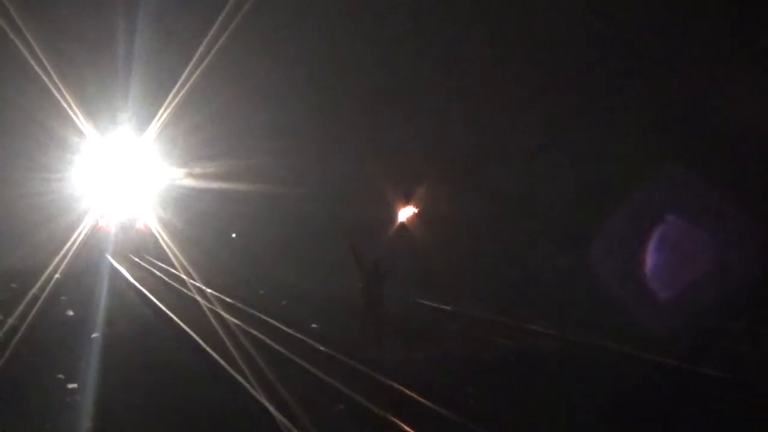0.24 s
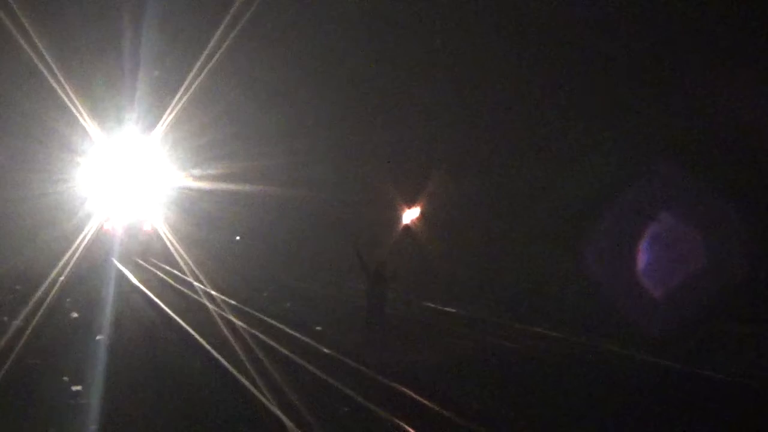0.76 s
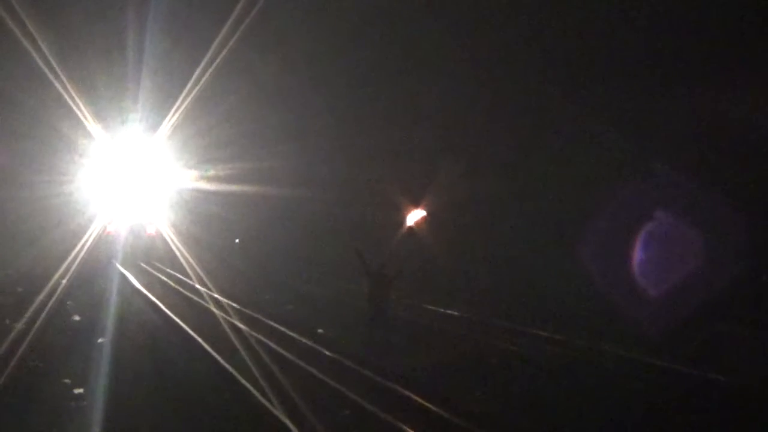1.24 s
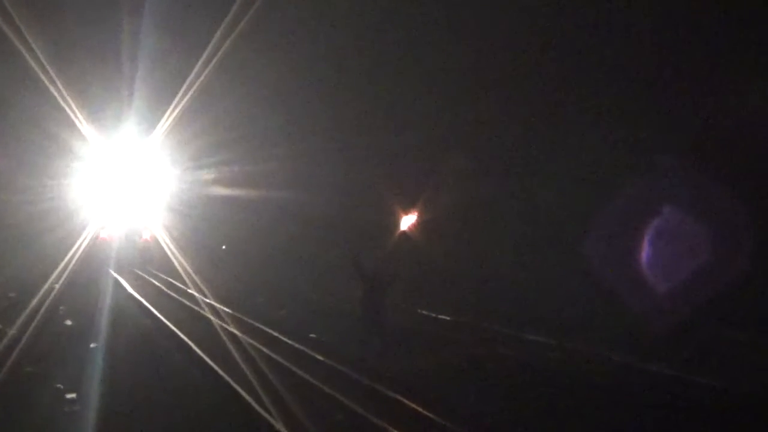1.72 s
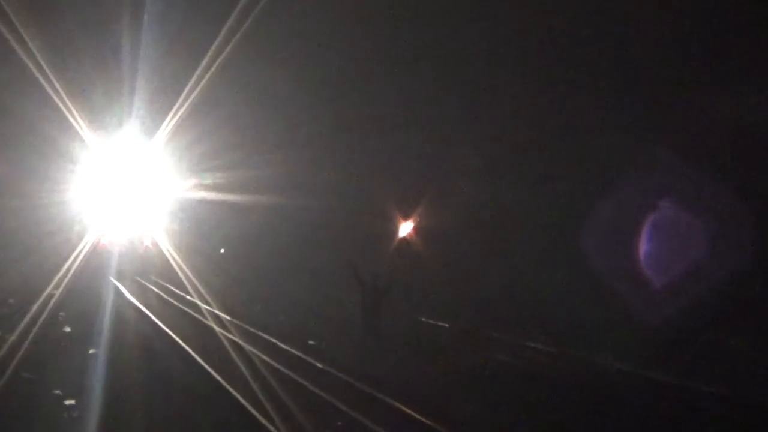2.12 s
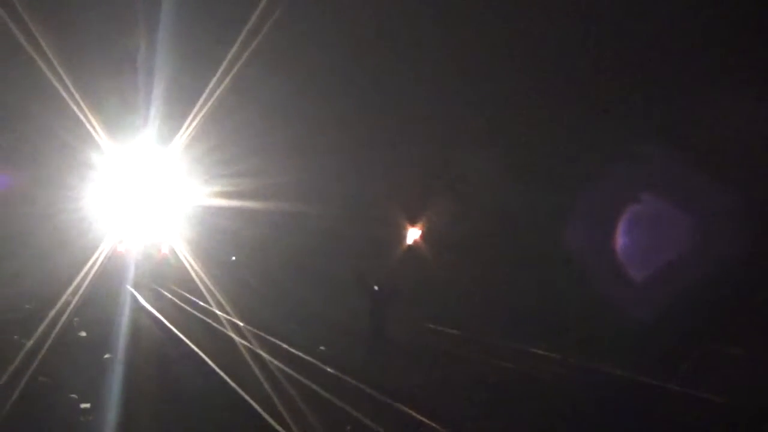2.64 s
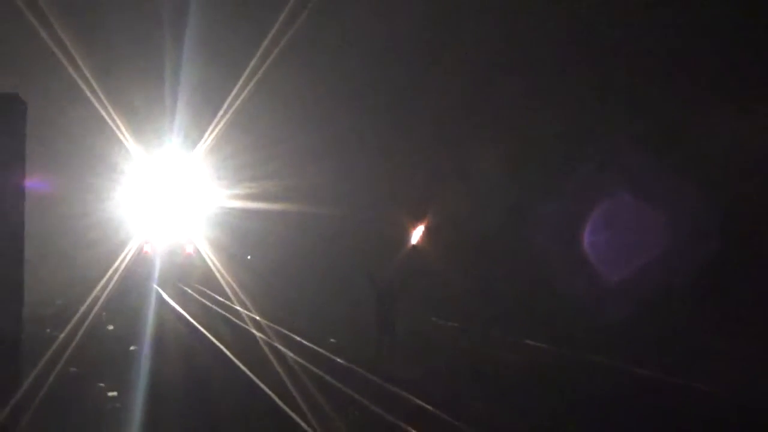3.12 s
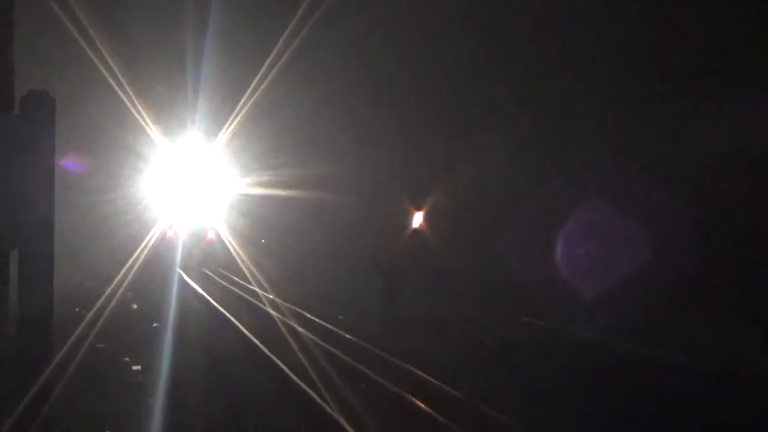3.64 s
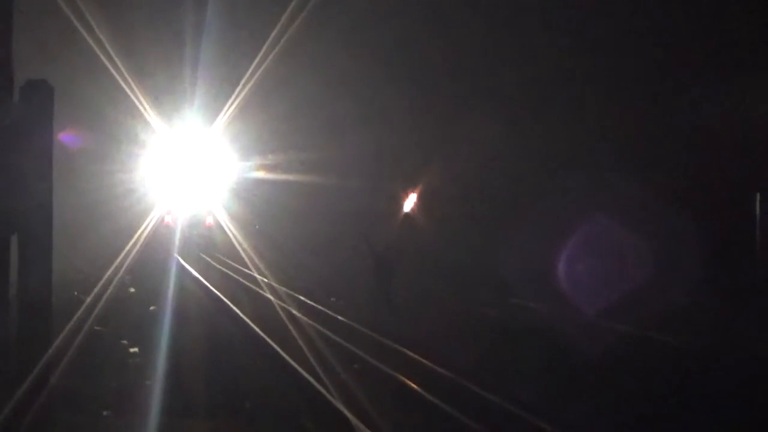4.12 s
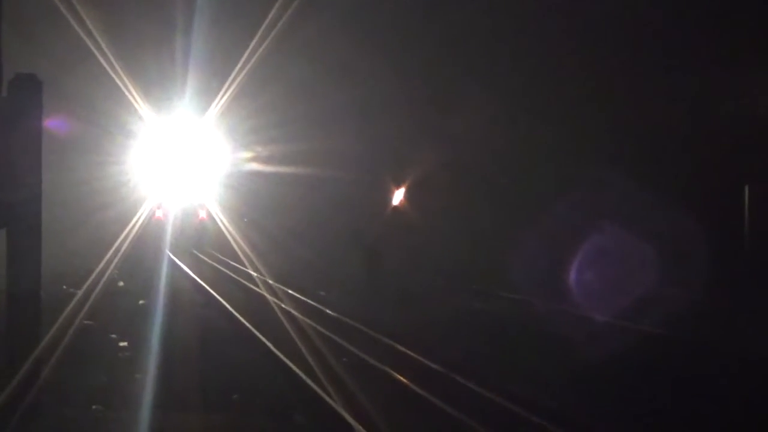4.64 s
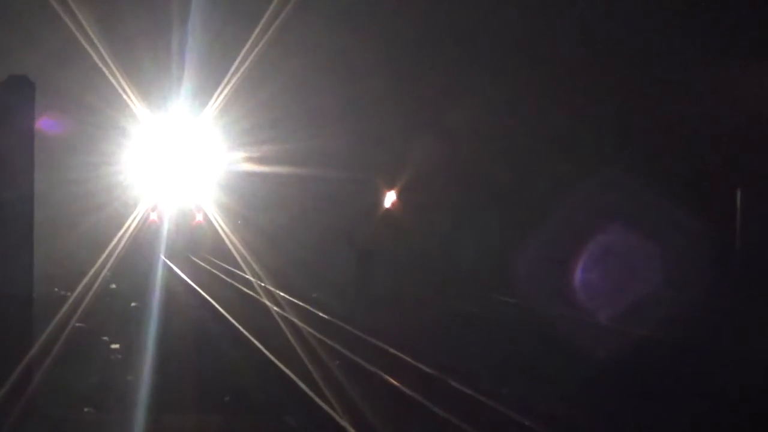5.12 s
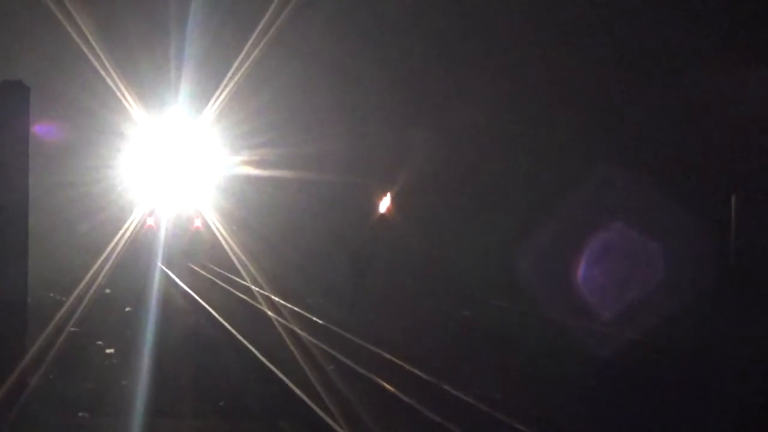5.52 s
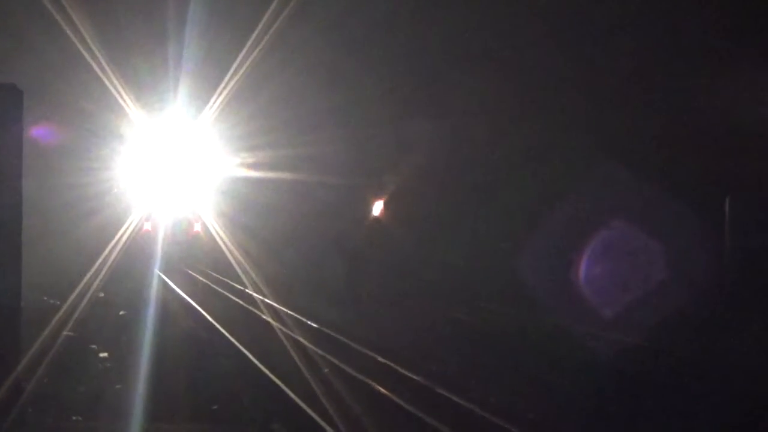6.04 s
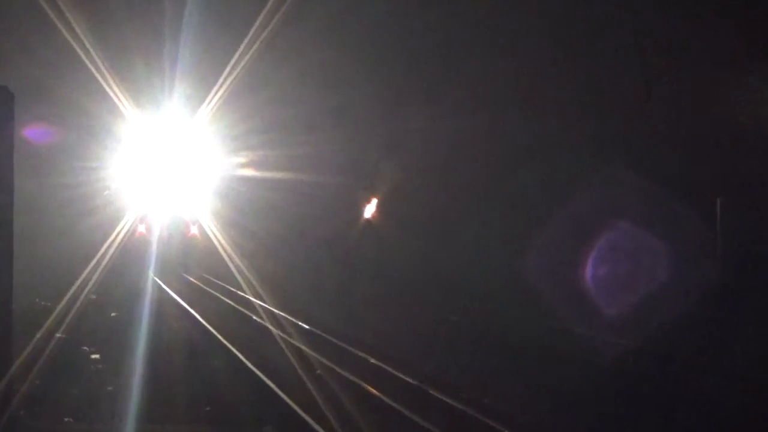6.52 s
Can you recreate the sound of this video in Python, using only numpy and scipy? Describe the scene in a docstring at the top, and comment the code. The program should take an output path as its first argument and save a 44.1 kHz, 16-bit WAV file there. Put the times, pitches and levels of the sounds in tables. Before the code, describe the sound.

Outdoors at night, an approaching diesel locomotive rumbles low and lumpy with faint, bright, regular ticking puffs. Its air horn gives a very short toot, then almost at once a long, harsh, steady blast, shimmering with wall echoes. A brief air spit hisses partway through. The horn cuts off, its echo dies, and the rumble creeps back. A handheld recorder's automatic gain ducks the engine under the horn.

```python
"""A diesel locomotive rumbles with lumpy noise, fuzzy hums and ringing valve gear puffs.
At 0.8 s its single-note air horn gives a short toot, then at 1.07 s a long blast built from 37 tones.
Walls throw the horn back as coloured echoes. Faint ticks fall under the blast, and at 3.34 s an air
valve spits a burst of bright noise. The recorder's gain control pulls the rumble down under the horn;
after the horn stops at 4.8 s the rumble creeps back, with more valve gear puffs."""
import sys
import numpy as np
from scipy import signal
from scipy.fft import rfft, irfft
from scipy.io import wavfile
from scipy.ndimage import uniform_filter1d

SR = 44100
rng = np.random.default_rng(int(sys.argv[2]) if len(sys.argv) > 2 else 0)


def output_pcm(signal):
    """Save a mono or channel-first signal as 16-bit PCM at the path in sys.argv[1].

    Samples are clipped to [-1, 1] before scaling.
    """
    pcm = np.clip(np.atleast_2d(signal).T, -1, 1) * 32767
    wavfile.write(sys.argv[1], SR, np.round(pcm).astype(np.int16))


N = 298557  # length in samples
STEP = 64  # samples between values of a slow control curve

# The two horn calls: start_s, length_s, level_db (before the changes made in blow)
BLASTS = [(0.822, 0.158, -33), (1.07, 3.751, -31.5)]


def horn():
    """The toot and the blast: the same tones, blown twice with the same slow and quick fading."""
    rates_hz = (2.4, 0.74, 59.0, 11.0)
    fading = np.transpose([wander(top_hz, count=37) for top_hz in rates_hz], (1, 0, 2))
    return sum(blow(start, length, level_db, fading) for start, length, level_db in BLASTS)


# Settled pitch of the note: time_s, pitch_hz
NOTE = [(.8, 301), (2.4, 300.8), (4, 301), (4.25, 301.4), (4.8, 301.3)]
# The note starts sharp and settles: extra_hz, settling_s
SHARP = [(14, .014), (5.5, .06)]
# Average strength of the tones at the bell: pitch_hz, level_db
HORN_TONES = [(301, -1), (602, 4), (903, 4), (1204, -7.5), (1505, -4.5), (1806, -3), (2107, 4.5), (2408, 4),
              (2709, -0.5), (3300, -2), (3900, -10), (4800, -11.5), (5700, -8.5), (11100, -17.5)]
# How much louder the horn is on the left: pitch_hz, left_over_right_db
HORN_LEAN = [(60, -0.5), (130, -0.5), (270, -5.5), (560, -1), (1180, 2), (2480, 2.5), (5220, -1),
             (11000, 2)]
# Tones well above this pitch miss the listener: time_s, pitch_hz
BEAM = [(.9, 7600), (1.5, 8550), (2.4, 8300), (3.05, 10500)]
# Level of the whole horn: time_s, level_db
PRESSURE = [(1.07, 2.5), (1.4, 4.5), (1.7, 1), (2.2, 1.5), (2.8, 0.5), (3.1, -1), (3.7, 2.5), (4.2, -3.5),
            (4.6, 4), (4.8, 3.5)]
# Which tones swell together, one row for each curve in SWELLS: first_tone, last_tone
SWELL_TONES = [(1, 1), (2, 2), (3, 3), (5, 6), (7, 8), (9, 11), (12, 14), (15, 37), (22, 27)]
# Groups of tones swell and sink as the horn moves among its echoes; each curve: time_s, level_db
SWELLS = [
    [(.9, 10), (1.3, 1.5), (1.85, 2), (2.5, -0.5), (3.2, -6.5), (3.7, -3.5), (4.12, -6), (4.3, 3),
     (4.6, 3.5), (4.75, -4)],
    [(1.1, -2.5), (1.6, -3.5), (2, -7), (2.35, -11), (2.5, -2), (2.9, 0), (3.3, -5), (3.8, 0), (4.08, 4),
     (4.3, -0.5), (4.58, 2.5), (4.75, -3)],
    [(1.1, -3.5), (1.35, -5), (1.8, 3), (2.08, -5), (2.22, 1), (2.6, -6.5), (2.78, -11.5), (3.2, -2),
     (3.7, -2.5), (4.12, -10.5), (4.6, -2), (4.8, -4.5)],
    [(1.1, 7), (1.5, 4), (2, 3.5), (2.7, 2), (3.7, 1.5), (4.3, 7), (4.8, 1.5)],
    [(1.1, -0.5), (1.45, 1.5), (1.75, 0), (2.1, 2.5), (2.8, 1), (3.1, -2.5), (3.5, 0), (3.9, 2), (4.3, 1),
     (4.8, 0)],
    [(1.1, 2.5), (1.6, -0.5), (2.1, 3), (2.8, 2.5), (3.2, -0.5), (4, 2.5), (4.8, -0.5)],
    [(1, 3.5), (3.1, 4), (3.8, -2.5), (4.4, 2.5)],
    [(.9, 2), (1.4, -1), (1.9, 4), (2.8, 6.5), (3.3, 3), (4, 5.5), (4.8, 2)],
    [(1.1, -3.5), (1.5, 3), (2.8, 4.5), (3.2, 0.5), (4.2, -3)],
]
LIFT_HZ, LIFT_S = 5, .045  # the pitch lifts as the air is cut
ATTACK_S, RELEASE_S = 0.019, 0.038
BLOOM_S = 0.0083  # bright tones start this much late and stop as much early
KICK_DB, KICK_S = 15, .022  # the second tone leaps out at the start
MISSED_DB = -11  # loss of the tones that miss the listener


def blow(start, length, blast_db, fading):
    """A diaphragm lets out one sharp puff a turn; the ground returns it upside down; moving air stirs it."""
    t = np.arange(fading.shape[-1]) * STEP / SR
    span = slice(round(start * SR), round((start + length) * SR))
    now = np.arange(N)[span] / SR
    age, left = now - start, start + length - now

    pitch = curve(now, NOTE) + sum(hz * np.exp(-age / s) for hz, s in SHARP)
    pitch += LIFT_HZ * np.clip(1 - left / LIFT_S, 0, 1)
    pitch += 0.262 * flutter(10.0)[span]
    turns = np.cumsum(pitch) / SR
    spin = np.exp(2j * np.pi * turns)

    # the bell rings after each puff, not before: its tone levels set how each tone is shifted in phase
    log_strength = read(HORN_TONES, abs(np.fft.fftfreq(2048, 1 / SR))) * np.log(10) / 20
    bell_phase = -signal.hilbert(log_strength).imag

    beam_hz = curve(t, BEAM)
    level_db = blast_db + curve(t, PRESSURE)
    gust = wander(19.0, count=1)[0]  # felt by all tones at once
    out, tone = np.zeros((2, N)), 1
    for k, (slow, apart, quick, twist) in enumerate(fading, 1):
        hz = k * NOTE[0][1]
        db = read(HORN_TONES, hz) + level_db
        db += MISSED_DB / (1 + np.exp((beam_hz - hz) / 350))
        for (first, last), swell in zip(SWELL_TONES, SWELLS):
            if first <= k <= last:
                db += curve(t, swell)
        if k == 2:
            db += KICK_DB * np.exp(-abs(t - start) / KICK_S)

        stir = (k / 8) ** .5  # short waves are stirred more
        phase = bell_phase[round(hz / SR * 2048)] + 0.21 * stir * twist
        wave = ground(hz, t) * np.exp(1j * phase)
        late = BLOOM_S * min((k - 1) / 6, 1)
        gate = np.clip((age - late) / ATTACK_S, 0, 1) * np.clip((left - late) / RELEASE_S, 0, 1)
        tone = tone * spin  # one more multiple of the note
        shared_db = stir * (0.86 * slow + 0.55 * gust) + 1.03 * quick
        lean_db = 1.03 * apart + read(HORN_LEAN, hz) / 2
        for side, sign in enumerate((1, -1)):
            size = wave * amp(db + shared_db + sign * lean_db) * np.exp(.1j * sign * slow)
            out[side, span] += (np.interp(now, t, size) * tone).real * gate
    return out


# Ground bounce: time_s, delay_ms, share (of the direct sound), halved_hz (pitch where it is halved)
GROUND = [(1, 0.26, 0.56, 11000), (1.6, 0.26, 0.92, 8500), (2.2, 0.26, 0.77, 6000), (2.9, 0.29, 0.8, 4900),
          (3.3, 0.32, 0.67, 5400), (3.901, 0.35, 0.49, 4640), (4.7, 0.29, 0.63, 4520)]


def ground(hz, t):
    """Direct sound plus its inverted, dulled bounce: hollows at multiples of 1 / delay."""
    s, *columns = np.transpose(GROUND)
    delay_ms, share, halved_hz = (np.interp(t, s, column) for column in columns)
    bounce = share / (1 + (hz / halved_hz) ** 4)
    return 1 - bounce * np.exp(-2j * np.pi * hz * delay_ms / 1000)


# Walls; each filter is used twice: delay_s, level_db, strongest_hz, filter_width_hz, left_over_right_db
ECHOES = [(.045, -11, 680, 513, -9), (.125, -17, 2050, 915, 0), (0.1396, -9.5, 311, 286, -1.5),
          (.13, -12, 3320, 1480, -3), (.215, -15, 1080, 605, -10), (.29, -22.5, 2540, 700, -6),
          (.38, -14.5, 600, 300, 2), (.42, -21, 1315, 414, -9), (.45, -25, 2480, 350, 6)]
# How long the scattered tail takes to die by 60 dB: pitch_hz, fade_s
YARD = [(300, 2), (2500, 0.56), (8000, 0.19)]


def yard(x):
    """Coloured slaps from walls, then sparse scattered taps dying band by band."""
    out = np.zeros((2, N))
    for delay, db, hz, width, pan_db in ECHOES:
        slap = resonate(resonate(x, hz, width), hz, width)
        slap = np.roll(slap, round(delay * SR))
        slap *= amp(2.54 * flutter(19.5))  # the long path flutters
        out += amp(db + np.array([[.5], [-.5]]) * pan_db) * slap

    # one tap at a random place in every 20 samples, pushing up or down
    taps = np.zeros((2, SR))
    at = np.arange(600, SR - 20, 20) + rng.integers(0, 20, (2, (SR - 601) // 20))
    np.put_along_axis(taps, at, rng.choice([-1., 1.], at.shape), 1)
    hz, t, z = signal.stft(taps, SR, nperseg=256)
    z *= amp(-60 * t / read(YARD, hz)[:, None])
    tail = signal.istft(z, SR, nperseg=256)[1]
    tail /= np.linalg.norm(tail[0])
    return out + amp(-17.0) * signal.fftconvolve(x[None], tail, axes=1)[:, :N]


# Colour of the air jet: pitch_hz, relative_level_db
SPIT_COLOUR = [(590, -19.5), (1000, -12), (1460, -8), (1590, -10), (2040, -8.5), (2230, -11), (2370, -7.5),
               (4030, -8.5), (6930, -9), (8560, 1), (11000, -11), (14300, -45), (22000, -120)]
SPIT_S, SPIT_SHUT_S, SPIT_DB = 3.34, 3.54, -11  # opens, starts to shut, level
CRACK_S, SWELL_DB, SWELL_S = 0.013, 11.5, 0.15  # cracks open, then swells by SWELL_DB
SHUT_S, DREG_DB, DREG_DB_PER_S = 0.012, -12, 202  # shuts fast, then the last air hisses out


def spit():
    """A short bright jet of compressed air, made of noise: the valve cracks open, swells, holds and shuts."""
    t = np.arange(N) / SR
    age, shut = t - SPIT_S, np.maximum(t - SPIT_SHUT_S, 0)
    opening = np.clip(age / CRACK_S, 0, 1) ** 2
    opening *= amp(-SWELL_DB * np.clip(1 - age / SWELL_S, 0, 1))
    closing = np.maximum(np.exp(-shut / SHUT_S), amp(DREG_DB - DREG_DB_PER_S * shut))
    jet = noise(lambda hz, _: read(SPIT_COLOUR, hz), lambda hz: 0.84 + 0 * hz,
                lambda hz: -1.2 + 0 * hz, patchy_db=0.79)
    return jet * opening * closing * amp(SPIT_DB + 1.0 * flutter(40.))


# Colour of the roar when farther: pitch_hz, relative_level_db
FAR = [(18, -33), (30, 7.5), (53, -7), (108, -11), (239, -2), (321, -13.5), (364, -8.5), (489, -9.5),
       (977, -16), (1350, -18.5), (3530, -28.5), (4520, -27), (5510, -34), (8810, -30), (11000, -38),
       (14300, -72), (22000, -120)]
# Colour of the roar when nearer: pitch_hz, relative_level_db
NEAR = [(18, -32), (30, 1), (54, -0.5), (129, -9), (178, -5), (329, -12.5), (501, -13), (596, -12),
        (675, -12), (1190, -22), (1600, -21), (2100, -23), (2260, -26), (8590, -34.5), (11000, -39.5),
        (14300, -86), (22000, -120)]
# Likeness of left and right in the roar: pitch_hz, likeness (1 is the same)
SAME = [(60, 0.94), (130, 0.91), (270, 0.84), (560, 0.59), (1180, 0.72), (2480, 0.8), (5220, 0.65),
        (11000, 0.91)]
# How much louder the roar is on the left: pitch_hz, left_over_right_db
LEAN = [(60, -1), (130, 0), (270, -7), (560, -4.5), (1180, -3), (2480, -2.5), (5220, -1.5), (11000, -5)]
# Level of the roar: time_s, level_db
ROAR = [(0, -33), (1, -27), (2.5, -32), (3, -38.5), (4, -39), (5, -34.5), (5.5, -35), (6.77, -34.5)]
# Exhaust and fan hums; each filter is used twice: pitch_hz, filter_width_hz, far_level_db, near_level_db
HUMS = [(42.7, 8.8, -37.5, -52), (177.6, 6.2, -52, -49), (240.3, 6.2, -41.5, -69), (504, 2.8, -80, -53)]
# Valve gear puffs: start_s, level_db
PUFFS = [(.13, -46), (.30, -42), (.48, -41), (.645, -42), (5.11, -44), (5.44, -45), (5.77, -44),
         (5.93, -57), (6.09, -48), (6.25, -46), (6.42, -44), (6.74, -48)]
# Ringing inside every puff: pitch_hz, width_hz, relative_level_db
PUFF_RING = [(4400, 500, 6), (7700, 80, 3), (8830, 930, 7)]


def engine():
    """Lumpy roar with fuzzy hums and faint ringing puffs; the colour shifts as it draws near."""
    def nearness(s):
        return np.clip((s - 1) / 4, 0, 1)

    def colour(hz, s):
        share = nearness(s)
        return (1 - share) * read(FAR, hz) + share * (read(NEAR, hz) + 2.46)

    t = np.arange(N) / SR
    near = nearness(t)
    roar = noise(colour, lambda hz: read(SAME, hz), lambda hz: read(LEAN, hz), patchy_db=1.16)
    roar *= amp(curve(t, ROAR) + 0.79 * flutter(8.1))

    for hz, width, far_db, near_db in HUMS:
        hum = resonate(resonate(rng.standard_normal(N), hz, width), hz, width)
        hum_db = (1 - near) * far_db + near * near_db
        roar += evened(hum) * amp(hum_db + np.array([[-.8], [.8]]))

    hiss = rng.standard_normal(N)
    ring = evened(sum(amp(db) * evened(resonate(hiss, hz, width)) for hz, width, db in PUFF_RING))
    puffs = bursts(PUFFS, rise_s=0.0068, fade_s=0.022) * ring
    return roar + puffs * amp([[-1.5], [1.5]])


# Faint ticks under the blast: start_s, level_db
TICKS = [(2.32, -36), (2.72, -38), (3.12, -38), (4.23, -42)]


def ticks():
    """Brief bright puffs of noise, spread widely around 3000 Hz."""
    bright = evened(resonate(rng.standard_normal(N), 3000, 5000))
    return bursts(TICKS, rise_s=.002, fade_s=0.0056) * bright


def bursts(starts, rise_s, fade_s):
    """A loudness curve with a quick rise and a dying fall at each start."""
    t = np.arange(N) / SR
    return sum(amp(db) * np.exp(-np.maximum(t - s, 0) / fade_s) * np.clip((t - s) / rise_s, 0, 1)
               for s, db in starts)


def noise(shape_db, same, lean_db, patchy_db):
    """Stereo noise, rms 1, from random short-time spectra; shape_db(hz, s) gives the colour."""
    frames, hz = N // 256 + 5, np.fft.rfftfreq(1024, 1 / SR)[:, None]
    a, b, c, d, patches = rng.standard_normal((frames, 513, 5)).T
    patches = uniform_filter1d(patches, size=14, axis=0)
    patches = evened(uniform_filter1d(patches, size=8, axis=1))
    like = np.clip(same(hz), -1, 1)
    left = a + 1j * b
    right = like * left + np.sqrt(1 - like ** 2) * (c + 1j * d)
    z = np.array([left, right])
    z *= amp(shape_db(hz, np.arange(frames) * 256 / SR) + patchy_db * patches)
    z *= amp(np.array([.5, -.5])[:, None, None] * lean_db(hz))
    return evened(signal.istft(z, nperseg=1024, noverlap=768)[1][:, :N])


def resonate(x, hz, width):
    """One resonance, which lets its own pitch through unchanged and weakens the rest."""
    return signal.lfilter(*signal.iirpeak(hz, hz / width, SR), x)


def wander(top_hz, count):
    """Rows of smooth chance, rms 1, with rates up to about top_hz, one value every STEP samples."""
    size = N // STEP + 2
    f = np.fft.rfftfreq(size, STEP / SR)
    spectrum = rfft(rng.standard_normal((count, size)))
    return evened(irfft(spectrum / (1 + (f / top_hz) ** 3), size))


def flutter(top_hz):
    """One row of smooth chance with a value for every sample."""
    row = wander(top_hz, count=1)[0]
    return np.interp(np.arange(N) / STEP, np.arange(len(row)), row)


def curve(t, points):
    """Straight lines through (time, value) points."""
    return np.interp(t, *np.transpose(points))


def read(points, hz):
    """A spectrum read on a log-frequency axis."""
    f, value = np.transpose(points)
    return np.interp(np.log(hz + 1), np.log(f + 1), value)


def amp(db):
    """Decibels to gain."""
    return 10 ** (np.asarray(db) / 20)


def evened(x):
    """Scales to rms 1."""
    return x / np.sqrt(np.mean(abs(x) ** 2) + 1e-20)


def scene():
    """Horn with its echoes, air valve, engine and ticks."""
    direct = horn()
    return direct + yard(direct.mean(0)) + spit() + engine() + ticks()


EDGE_HZ = 11100  # the recorder keeps only sound below this


def record(dry):
    """Gain control lifts quiet sound: a quick stage holds the level, a slow stage remembers loud spells."""
    hop = 128  # samples between gain decisions
    hop_s = hop / SR
    dry = signal.sosfilt(signal.butter(4, 33, "high", fs=SR, output="sos"), dry)  # microphone bass cut
    sensed = signal.sosfilt(signal.butter(1, 200, "high", fs=SR, output="sos"), dry)  # hears little bass
    power = uniform_filter1d((sensed ** 2).mean(0), size=400, origin=120)
    power_db = 10 * np.log10(abs(power)[::hop] + 1e-12)

    most_db, aim_db = 17.5, -19.  # largest gain, level aimed at
    memory, quick, gain_db = 0., most_db, []
    for p in power_db:
        loud = max(p + most_db - aim_db - 3.0, 0)
        if loud > memory:
            memory += (loud - memory) * hop_s / 0.82
        else:
            memory -= min(memory, 3.63 * hop_s)  # forgets 3.63 dB a second
        want = min(most_db - 0.74 * memory, 0.88 * (aim_db - p))
        settle_s = .006 if want < quick else .012
        quick += (want - quick) * min(hop_s / settle_s, 1)
        gain_db.append(quick)

    held = dry * amp(np.interp(np.arange(N) / hop, np.arange(len(gain_db)), gain_db))
    lowpass = signal.firwin(511, EDGE_HZ, window=("kaiser", 9), fs=SR)
    return signal.oaconvolve(held, lowpass[None], "same")


dry = scene()
out = record(dry)
output_pcm(out)
```